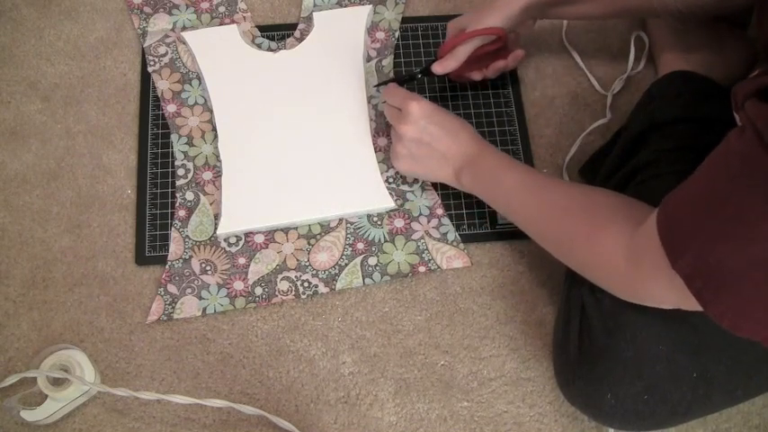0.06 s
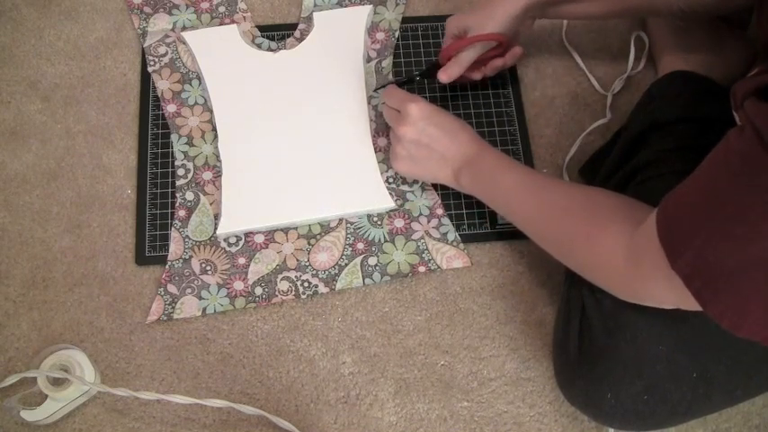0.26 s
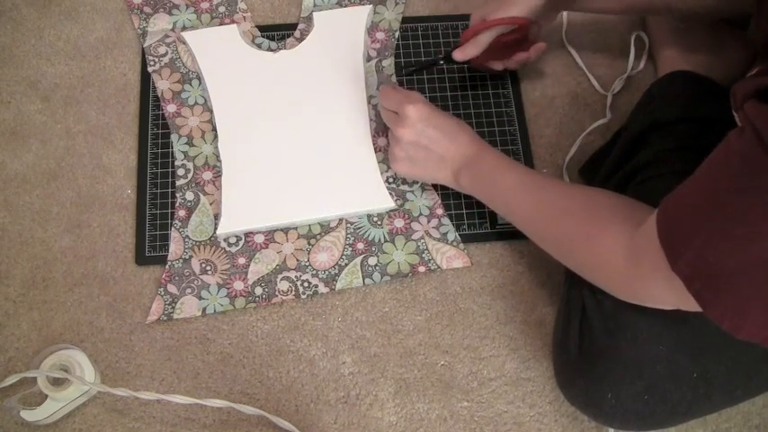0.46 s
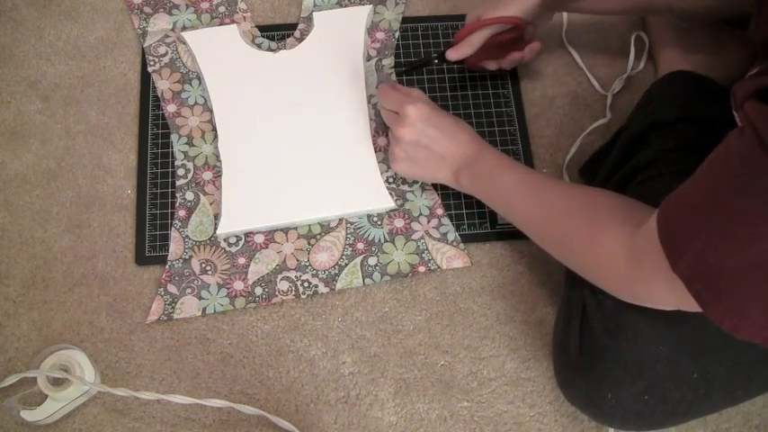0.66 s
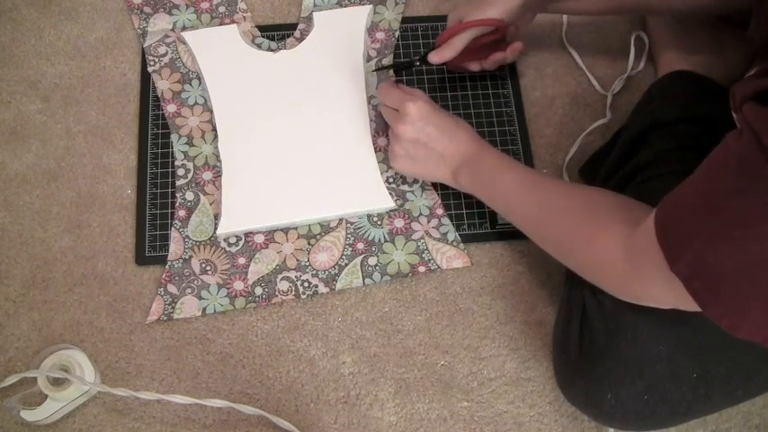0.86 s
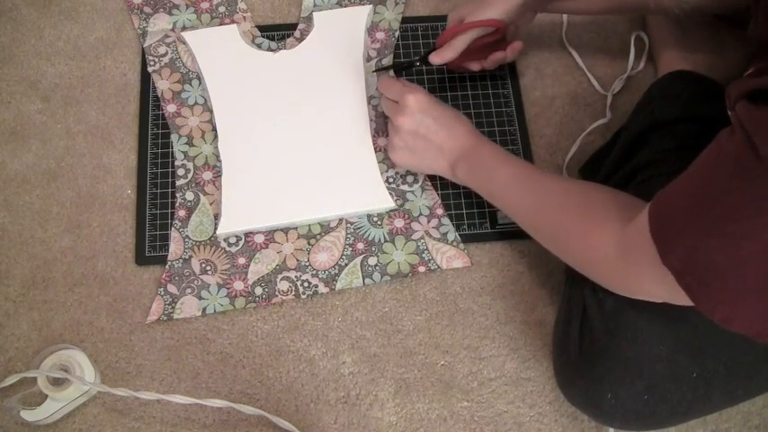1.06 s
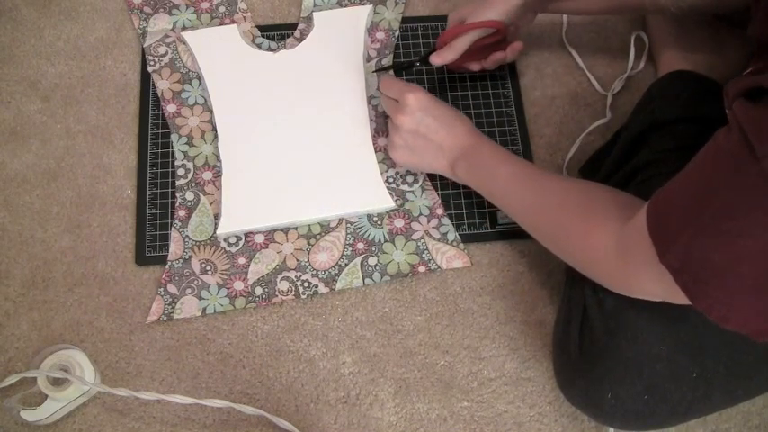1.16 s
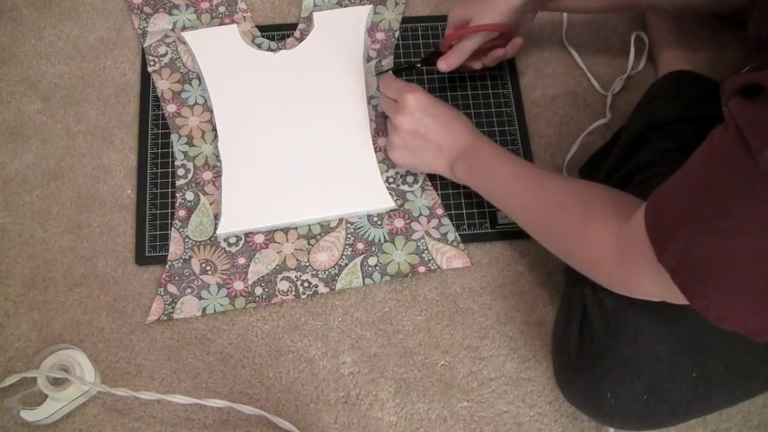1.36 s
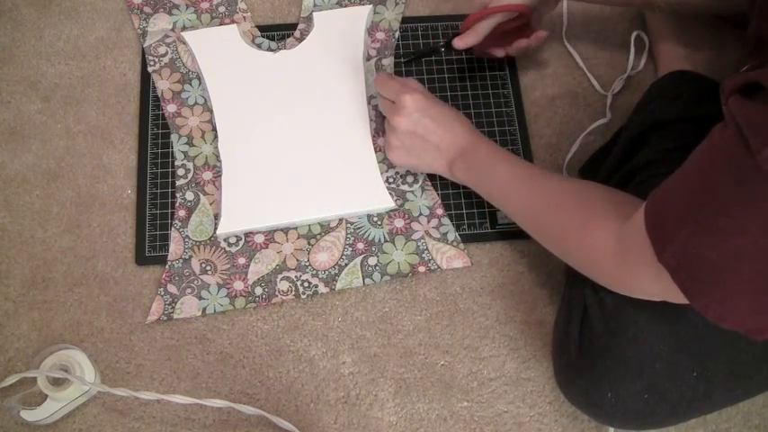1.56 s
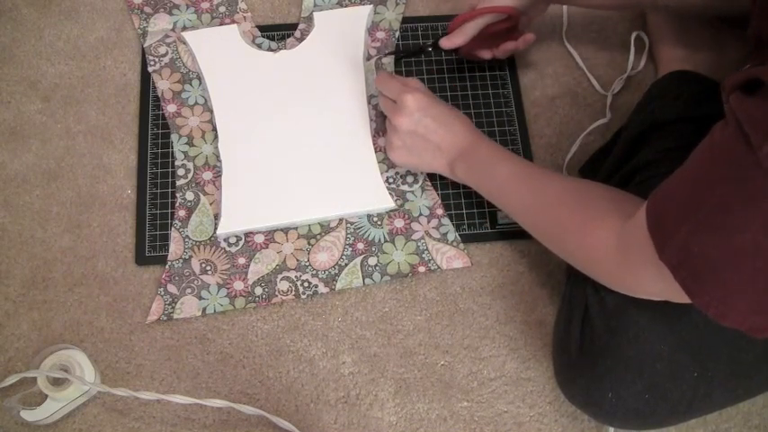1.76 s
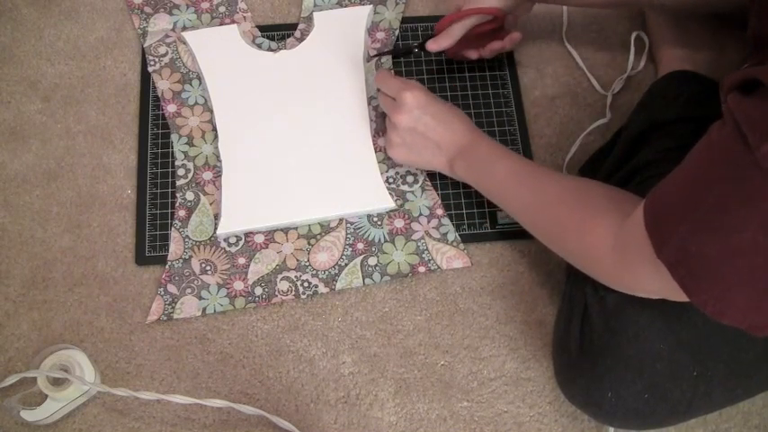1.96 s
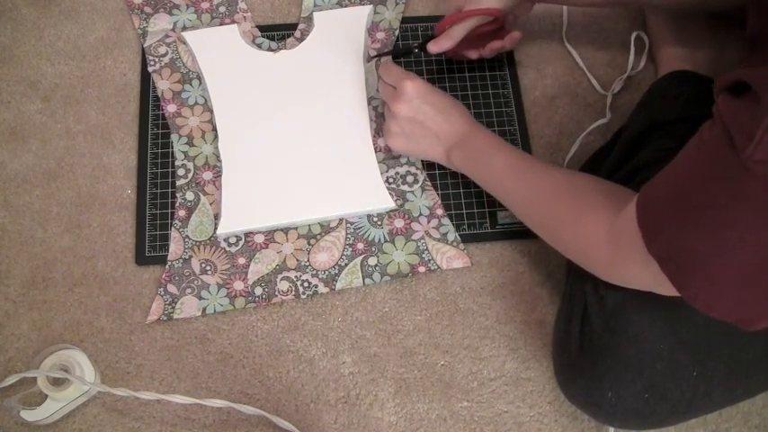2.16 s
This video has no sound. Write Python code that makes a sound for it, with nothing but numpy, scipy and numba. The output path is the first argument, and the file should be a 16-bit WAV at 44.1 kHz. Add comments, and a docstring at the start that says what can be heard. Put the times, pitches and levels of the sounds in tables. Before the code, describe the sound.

Scissors make two crunching snips through cotton cloth on a mat in a quiet carpeted room

```python
"""A quiet room, then steel scraping on steel: scissors make two cuts through cotton cloth on a cutting mat.
In each cut random slips ring the blades, snapping threads drive a crunch, and pulses knock the blades shut.
Then filtered clicks tick the pivot, a low pulse bumps the mat and juddering noise slides the blade forward.
Fine grains rub as the blades part and as the cloth is drawn into place; a small carpeted room answers."""
import sys
import numpy as np
from scipy import signal
from scipy.fft import rfft, irfft, next_fast_len
from scipy.io import wavfile
from scipy.ndimage import uniform_filter1d
from numba import njit

SR = 44100
rng = np.random.default_rng(int(sys.argv[2]) if len(sys.argv) > 2 else 0)


def materialize(psi):
    """Save the field psi as 16-bit PCM at rate SR to the path in sys.argv[1].

    A 1-D psi becomes a single channel; in a 2-D psi each row is a channel.
    """
    bounded = np.clip(np.atleast_2d(psi).T, -1, 1)
    quanta = np.round(bounded * 32767).astype(np.int16)
    wavfile.write(sys.argv[1], SR, quanta)


N = 97020
TIME = np.arange(N) / SR


def from_db(db):
    """Decibels to amplitude gain."""
    return 10 ** (np.asarray(db) / 20)


def rms_one(x):
    """Scale to unit power."""
    return x / np.sqrt(np.mean(x ** 2) + 1e-20)


def level_out(x):
    """Divide by the running RMS, so that a level curve alone sets the loudness."""
    return x / np.sqrt(uniform_filter1d(x ** 2, size=700) + 1e-12)


def t60_decay(age_s, t60_s):
    """Exponential decay that falls 60 dB in t60_s."""
    return np.exp(-np.log(1000) * age_s / t60_s)


def in_time(rows):
    """Gate open while a curve lasts, then each of its columns per sample."""
    s, *columns = np.transpose(rows)
    lasting = (TIME > s[0]) & (TIME < s[-1])
    gate = uniform_filter1d(lasting * 1., size=128)
    return [gate] + [np.interp(TIME, s, c) for c in columns]


def coloured(x, points):
    """Minimum-phase filter through (freq_hz, gain_db) points: the folded cepstrum makes it causal."""
    size = next_fast_len(N + SR // 2, real=True) * 2
    hz, db = np.transpose(points)
    bin_hz = np.arange(size // 2 + 1) * SR / size
    log_gain = np.log(from_db(np.interp(np.log(bin_hz + 1), np.log(hz), db)))
    cepstrum = irfft(log_gain)
    cepstrum[1:size // 2] *= 2
    cepstrum[size // 2 + 1:] = 0
    return irfft(rfft(x, size) * np.exp(rfft(cepstrum)))[..., :N]


def click(s):
    """One unit click; the tiny offset avoids denormals."""
    return (np.arange(N) == int(s * SR)) * 1. + 1e-18


def grains(per_s, spread_db):
    """Random clicks of uneven size and sign."""
    sizes = from_db(spread_db * np.minimum(rng.exponential(1, N), 4))
    signs = rng.choice([-1, 1], N)
    return sizes * signs * (rng.random(N) < per_s / SR) + 1e-18


def resonance(hz, width_hz):
    """Two-pole band-pass coefficients, gain near 1 on top."""
    r = np.exp(-np.pi * width_hz / SR)
    return np.array([1, 0, -1]) * (1 - r * r) / 2, [1, -2 * r * np.cos(2 * np.pi * hz / SR), r * r]


@njit
def gliding(x, hz, width_hz):
    """Two-pole low-pass whose corner and damping move."""
    out, low, band = np.zeros(len(x)), 0., 0.
    for i in range(len(x)):
        low += 2 * np.pi * hz[i] / SR * band
        band += 2 * np.pi / SR * (hz[i] * (x[i] - low) - width_hz[i] * band)
        out[i] = low
    return out


# room tone spectrum: freq_hz, gain_db
HUSH_COLOUR = [(25, -67), (42, -21), (58, -14), (75, -9.5), (120, -4.5), (270, 2), (540, -2.5), (800, -6.5),
               (1500, -9.5), (3000, -17), (6000, -25), (10000, -29), (15000, -34)]
# room tone, extra colour of the side signal: freq_hz, gain_db
HUSH_SIDE = [(60, -1), (130, -5.5), (290, 2), (640, 5.5), (1410, 2), (3100, -1), (6820, -2), (15000, 0.5)]
HUSH_DB = -57


def hush():
    """Steady room tone: shaped noise, partly opposite in phase between the sides."""
    mid, side = rms_one(coloured(rng.standard_normal((2, N)), HUSH_COLOUR))
    return from_db(HUSH_DB) * (mid + coloured(side, HUSH_SIDE) * [[1], [-1]])


# room resonances woken by every scissor and cloth sound: freq_hz, relative_level_db
ROOM_MODES = [(238, -3.5), (264, -13.5), (320, 0), (362, -2.5), (439, -1.5), (505, -6), (543, 4.5),
              (611, -27), (695, 1.5), (724, -4.5), (759, 2), (808, -2), (878, -4.5), (916, -4), (966, -9.5),
              (996, -3), (1079, 2), (1210, -13), (1400, -5)]
MODE_T60_S, MODES_DB = 0.17, 2
# diffuse tail common to both sides: freq_hz, gain_db
TAIL_COLOUR = [(100, -5.5), (250, -4), (500, -3), (1000, -10), (2000, -0.5), (5000, -7), (14000, -8.5)]
# diffuse tail opposite between the sides: freq_hz, gain_db
TAIL_SIDE = [(100, -13.5), (600, -18), (1200, -21.5), (2500, -17.5), (5000, -22.5), (7000, -16), (9500, -6),
             (14000, -3.5)]
TAIL_T60_S, TAIL_DELAY_S = .2, 0.003872


def room(x):
    """Direct sound, low room resonances and a short diffuse tail that differs between the sides."""
    age_s = TIME[:SR // 2]
    decay = (age_s > TAIL_DELAY_S) * t60_decay(age_s, TAIL_T60_S)
    decay = decay / np.linalg.norm(decay)
    noises = rng.standard_normal((2, len(age_s)))
    mid, side = [signal.fftconvolve(x, noise * decay)[:N] for noise in noises]
    mode_width_hz = np.log(1000) / np.pi / MODE_T60_S
    modes = 0
    for hz, db in ROOM_MODES:
        mode = signal.lfilter(*resonance(hz, mode_width_hz), x + 1e-18)
        modes = modes + from_db(db + MODES_DB) * mode
    tail = coloured(mid, TAIL_COLOUR) + coloured(side, TAIL_SIDE) * [[1], [-1]]
    return x + modes + tail


def swells(rows, colour):
    """Soft rubbing: dense fine grains under Gaussian swells."""
    level = sum(from_db(db) * np.exp(-((TIME - s) / half_s) ** 2) for s, half_s, db in rows)
    return level * rms_one(coloured(grains(per_s=12000, spread_db=0.5), colour))


# cloth drawn over the blade: centre_s, half_length_s, level_db
BRUSHES = [(1.07, 0.16, -67), (2.19, 0.11, -62.5)]
# cloth rub spectrum: freq_hz, gain_db
BRUSH_COLOUR = [(500, -18), (2000, 5), (4000, 2), (6000, 2), (9500, 4), (12500, -1), (15000, -20)]


def cloth_brushes():
    """Cloth drawn softly over the blade after each cut: fibres rub as fine grains."""
    return swells(BRUSHES, BRUSH_COLOUR)


# blades rubbing as they part: centre_s, half_length_s, level_db
OPENINGS = [(0.468, 0.0066, -56), (0.487, 0.018, -54), (1.59, 0.045, -54.5)]
# steel rub spectrum: freq_hz, gain_db
OPENING_COLOUR = [(800, 10.5), (2300, 3.5), (3000, -8), (4000, 1), (5800, -6), (7300, -6), (8500, -5),
                  (15000, -18)]


def blade_openings():
    """Blades rub lightly as they part: fine grains with a steel colour."""
    return swells(OPENINGS, OPENING_COLOUR)


# blade pushed over the mat, one curve per push: time_s, level_db, upper_edge_hz
SLIDES = [
    [(0.605, -41, 350), (0.655, -61.5, 496), (0.697, -48.5, 800), (0.71, -44, 1400), (0.735, -43.5, 1290),
     (0.79, -42, 1210), (0.838, -39.5, 950), (0.872, -44.5, 794), (0.915, -50.5, 393), (0.97, -75, 350)],
    [(1.47, -56, 900), (1.505, -49, 1020), (1.518, -42.5, 1320), (1.535, -51.5, 1020), (1.586, -47.5, 1200),
     (1.6, -37, 1810), (1.64, -40, 1580), (1.675, -56.5, 1410)],
    [(1.715, -61, 900), (1.76, -48, 1430), (1.80, -45, 1420), (1.84, -42.5, 1430), (1.89, -44, 1120),
     (1.95, -49, 710), (2.01, -65, 500)],
]
# low cut of each push: corner_hz
PUSH_LOW_CUT_HZ = [127, 360, 136]
# mat rub spectrum: freq_hz, gain_db
MAT_COLOUR = [(60, -19), (160, -16), (240, 0.5), (350, 1.5), (540, -0.5), (680, -8), (1000, -6.5),
              (1400, -5.5), (2000, -20.5), (4200, -24), (9000, -20.5)]
SLIPS_PER_S, SLIP_SPREAD_DB = 1500, 2.0


def mat_slide():
    """The lower blade judders over the mat: random slips under a moving upper edge."""
    out = 0
    for push, low_cut_hz in zip(SLIDES, PUSH_LOW_CUT_HZ):
        gate, db, edge_hz = in_time(push)
        slips = coloured(grains(SLIPS_PER_S, SLIP_SPREAD_DB), MAT_COLOUR)
        rub = gliding(slips, edge_hz, 1.93 * edge_hz)
        rub = signal.lfilter(*signal.butter(2, low_cut_hz, "high", fs=SR), rub)
        out = out + gate * from_db(db) * level_out(rub)
    return out


# floor under the mat as the blades shut: start_s, level_db
THUMPS = [(0.283, -48), (1.414, -48.5)]
THUMP_HZ, THUMP_RISE_S, THUMP_T60_S = 106.7, 0.0068, 0.19


def floor_thumps():
    """The floor booms as the blades shut: one low mode, softly started, decaying."""
    out = 0
    for s, db in THUMPS:
        age_s = np.maximum(TIME - s, 0)
        envelope = (1 - np.exp(-age_s / THUMP_RISE_S)) * t60_decay(age_s, THUMP_T60_S)
        out = out + from_db(db) * envelope * np.sin(2 * np.pi * THUMP_HZ * age_s)
    return out


# dull knocks of handles and blade: start_s, dry_peak_db, upper_edge_hz
KNOCKS = [(0.2953, -19, 1110), (0.4791, -29.5, 845), (0.5754, -18.5, 1510), (1.4151, -19, 900),
          (1.5097, -37, 1390), (1.6003, -26.5, 1530), (1.6072, -26, 1500)]
# knock spectrum: freq_hz, gain_db
KNOCK_COLOUR = [(30, -31), (60, -35), (150, -8.5), (280, 2.5), (500, -0.5), (900, -1.5), (1500, -2.5),
                (2500, -15.5), (5000, -1.5), (12000, -26)]


def knocks():
    """Soft contacts: one low-passed pulse each."""
    out = 0
    for s, db, edge_hz in KNOCKS:
        pulse = signal.lfilter(*signal.butter(3, edge_hz, fs=SR), click(s))
        pulse = coloured(pulse, KNOCK_COLOUR)
        out = out - from_db(db) * pulse / np.abs(pulse).max()
    return out


# handles clacking together: start_s, level_db
CLACKS = [(0.2918, -43), (1.411, -35)]
# handle resonances: freq_hz, relative_level_db
HANDLE_MODES = [(1400, -3), (1441, 3), (1520, -21), (1930, -5.5), (2374, -7.5)]
HANDLE_T60_S = 0.068


def handle_ring():
    """The plastic handles ring briefly when they meet: a sum of decaying modes."""
    out = 0
    for s, db in CLACKS:
        age_s = np.maximum(TIME - s, 0)
        ring = sum(from_db(db + mode_db) * np.sin(2 * np.pi * hz * age_s) for hz, mode_db in HANDLE_MODES)
        out = out + ring * t60_decay(age_s, HANDLE_T60_S)
    return out


# pivot ticks as the blades part or meet: start_s, click_level_db (before colour)
TICKS = [(0.4734, -33), (0.4793, -46), (1.2667, -43.5), (1.5645, -37)]
# steel tick spectrum: freq_hz, gain_db
TICK_COLOUR = [(800, -7), (1700, -2), (2300, 6), (2900, -5), (4900, 0), (6000, -9), (6900, 5), (7700, 1),
               (8600, -12), (9600, -5), (11500, -22), (15000, -16)]


def pivot_ticks(rattle_db=-7, rattle_s=0.004):
    """Small steel ticks: a click and a fast-decaying noise rattle excite the pivot's colour."""
    hits = 0
    for s, db in TICKS:
        decay = (TIME > s) * np.exp(-np.abs(TIME - s) / rattle_s)
        rattle = decay * rng.standard_normal(N)
        hits = hits + from_db(db) * (click(s) + from_db(rattle_db) * rattle)
    return coloured(hits, TICK_COLOUR)


# steel on steel as the blades close, one curve per cut: time_s, level_db
SCRAPES = [
    [(0.108, -70), (0.12, -55), (0.138, -85), (0.158, -51), (0.18, -75), (0.19, -50), (0.215, -49),
     (0.285, -50), (0.298, -48)],
    [(1.255, -69), (1.269, -50.5), (1.287, -56.5), (1.297, -49.5), (1.311, -56.5), (1.325, -49.5),
     (1.39, -51), (1.402, -79)],
]
# blade spectrum: freq_hz, gain_db
SCRAPE_COLOUR = [(900, -13.5), (2200, -4), (2900, -11), (3700, -2), (4200, -6.5), (4830, 3.5), (5700, -7),
                 (7600, -13), (9000, -6), (10800, -28), (15000, -23)]


def blade_scrape(catch_db=1.5, catch_s=.006):
    """Fine slips of edge on edge ring the steel; the edges catch unevenly."""
    level = sum(gate * from_db(db) for gate, db in map(in_time, SCRAPES))
    slips = coloured(grains(per_s=3000, spread_db=3.0), SCRAPE_COLOUR)
    catching = np.interp(TIME / catch_s, np.arange(N), rng.standard_normal(N))
    return level * rms_one(slips * from_db(catch_db * catching))


# cloth between the blades, one curve per cut: time_s, crunch_level_db, crunch_pitch_hz, snap_level_db
BITES = [
    [(0.15, -58, 910, -74), (0.213, -50.5, 673, -59), (0.23, -39.5, 510, -53), (0.25, -34.5, 750, -43),
     (0.263, -40, 586, -49.5), (0.276, -34.5, 970, -39.5), (0.294, -30.5, 760, -37), (0.3, -44.5, 744, -60),
     (0.315, -39.5, 734, -78), (0.335, -64, 600, -80)],
    [(1.265, -54.5, 880, -88), (1.337, -54, 640, -53), (1.349, -38, 560, -48.5), (1.374, -37.5, 610, -44.5),
     (1.391, -33, 900, -39), (1.398, -50, 770, -57), (1.407, -40, 950, -38.5), (1.412, -24.5, 1410, -33.5),
     (1.418, -40, 1440, -86)],
]
# thread snap spectrum: freq_hz, gain_db
THREAD_COLOUR = [(150, -22.5), (1500, 5.5), (2350, 2.5), (2900, 0.5), (4800, -0.5), (6000, -5.5), (7100, 1),
                 (7900, -5.5), (9800, -1), (11400, -6), (12800, -4.5), (14300, -0.5), (15500, -32)]
THREADS_PER_S, THREAD_SPREAD_DB, CRUNCH_WIDTH_HZ = 2200, 3, 460


def cloth_cut():
    """Threads snap one after another and drive a crunch resonance whose pitch moves through each cut."""
    threads = grains(THREADS_PER_S, THREAD_SPREAD_DB)
    crunch_level, snap_level = 0, 0
    for gate, crunch_db, _, snap_db in map(in_time, BITES):
        crunch_level = crunch_level + gate * from_db(crunch_db)
        snap_level = snap_level + gate * from_db(snap_db)
    # pitch runs on through the gap between cuts
    pitch_hz = in_time([row for bite in BITES for row in bite])[2]
    crunch = gliding(threads, pitch_hz, np.full(N, CRUNCH_WIDTH_HZ * 1.))
    crunch = coloured(crunch, [(60, -25.5), (200, -15), (450, 3), (1050, -2), (1500, -2), (4000, -7.5)])
    fibres = rms_one(threads) + from_db(1) * rng.standard_normal(N)
    snaps = rms_one(coloured(fibres, THREAD_COLOUR))
    return crunch_level * level_out(crunch) + snap_level * snaps


def scene():
    """The scissors, slightly to the right, in the quiet room."""
    contacts = floor_thumps() + knocks() + handle_ring() + pivot_ticks()
    scissors = mat_slide() + contacts + blade_scrape() + cloth_cut()
    rubbing = cloth_brushes() + blade_openings()
    side_gains = from_db([[-2.2], [-1.5]])  # left, right
    return room(scissors + rubbing) * side_gains + hush()


CUTOFF_HZ = 15600


def record(dry):
    """Steep elliptic low-pass: 0.2 dB ripple, 70 dB stop band."""
    return signal.sosfilt(signal.ellip(10, .2, 70, CUTOFF_HZ, fs=SR, output="sos"), dry)


dry = scene()
out = record(dry)
materialize(out)
```